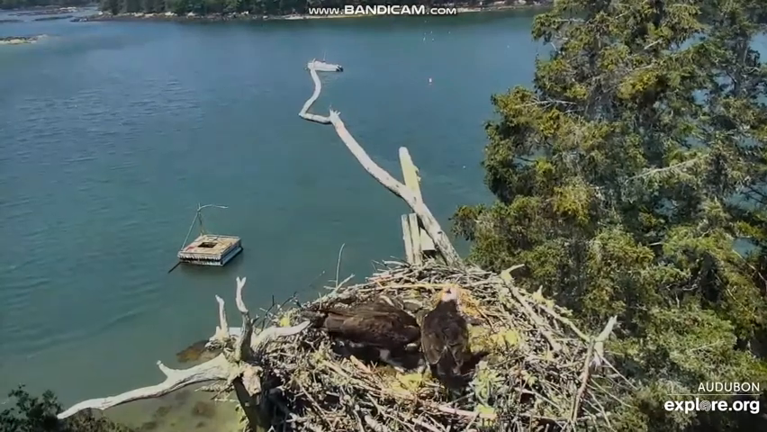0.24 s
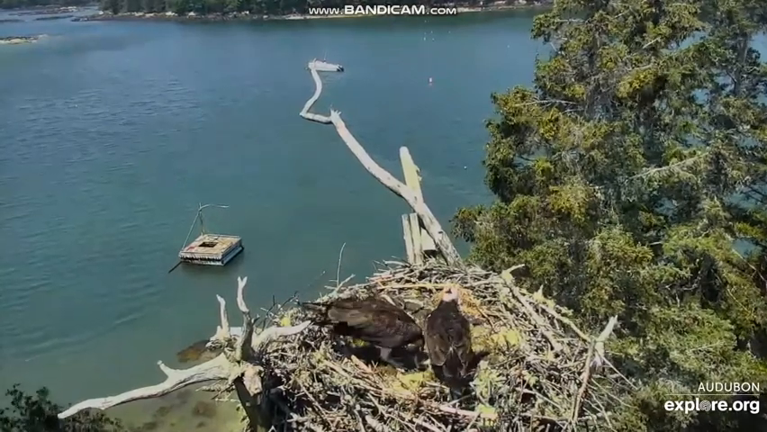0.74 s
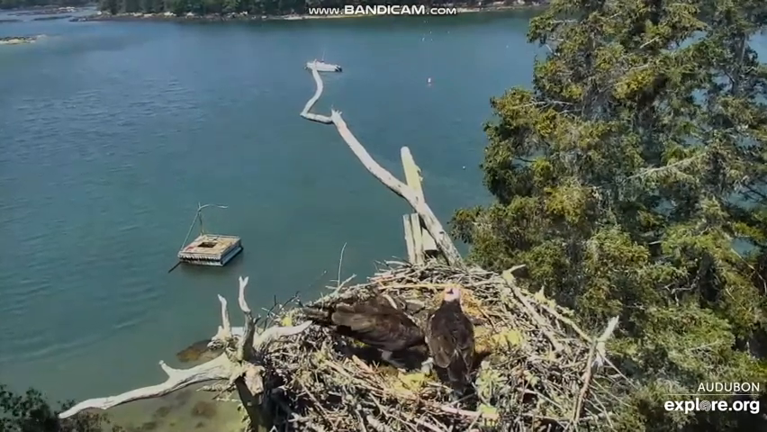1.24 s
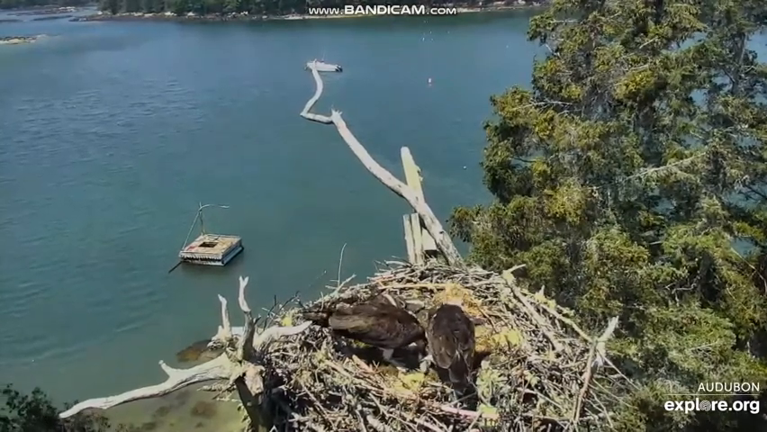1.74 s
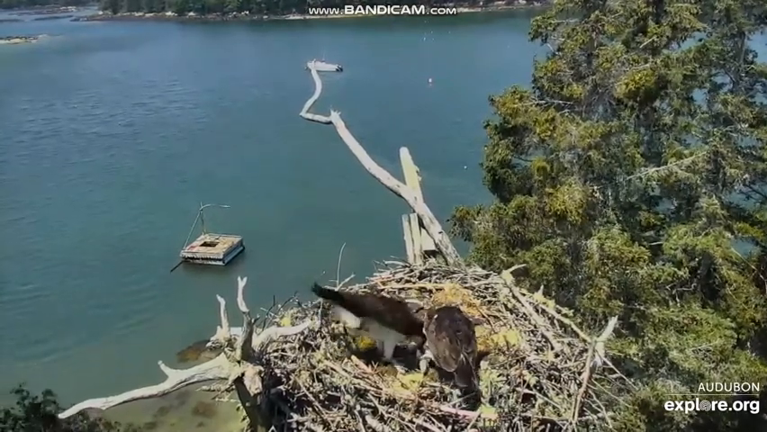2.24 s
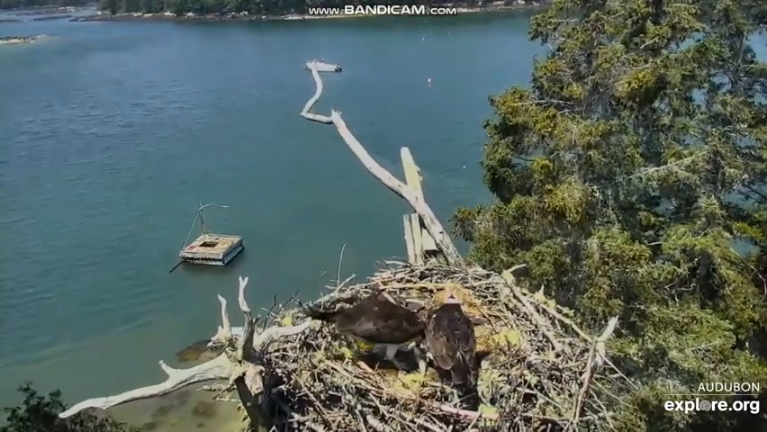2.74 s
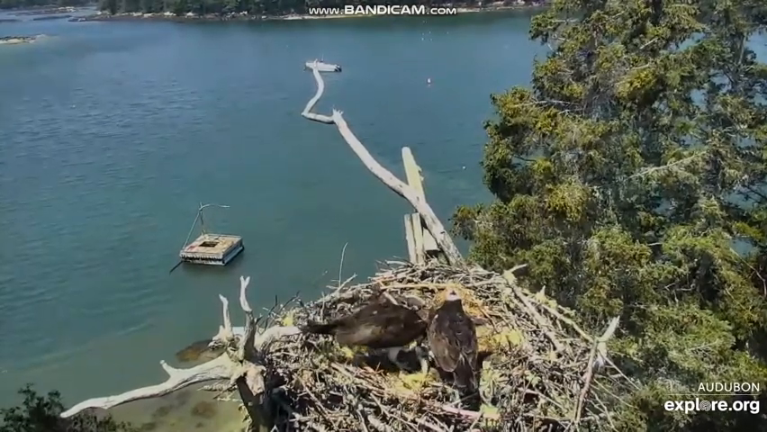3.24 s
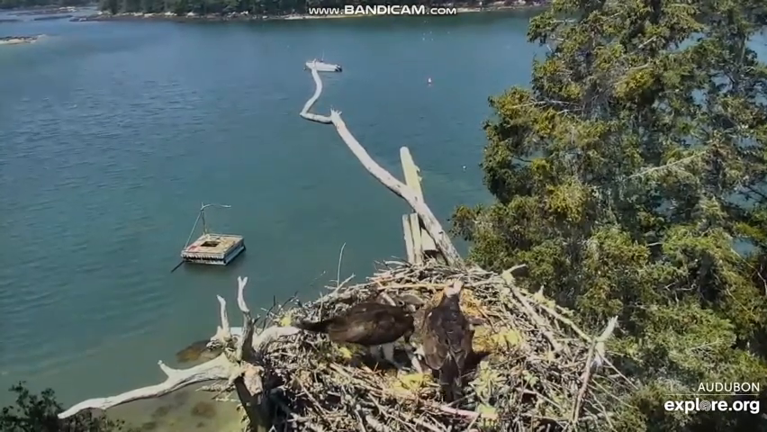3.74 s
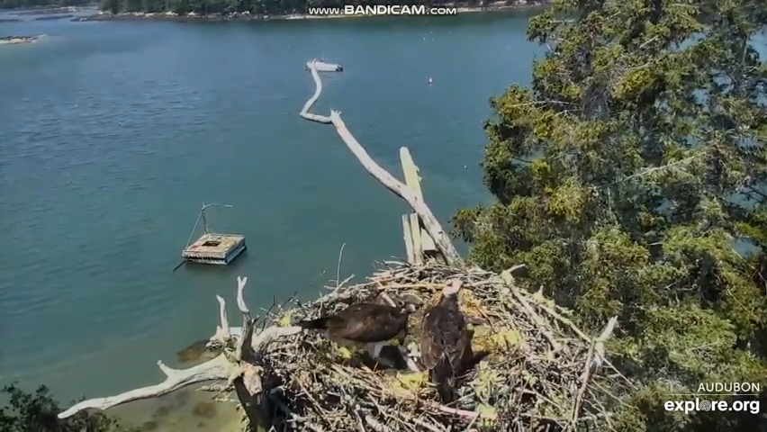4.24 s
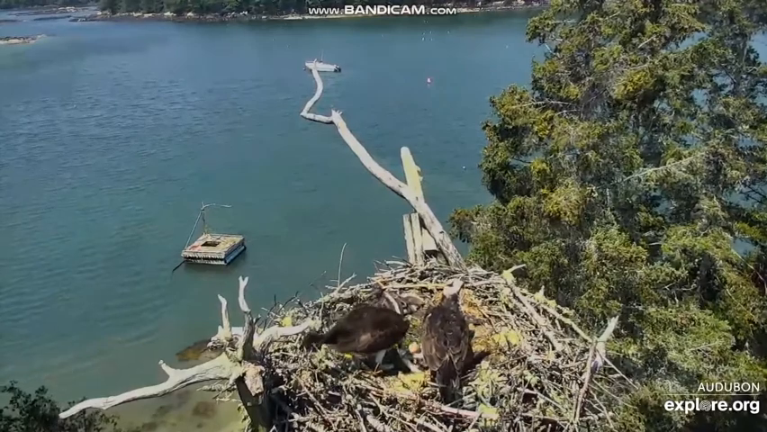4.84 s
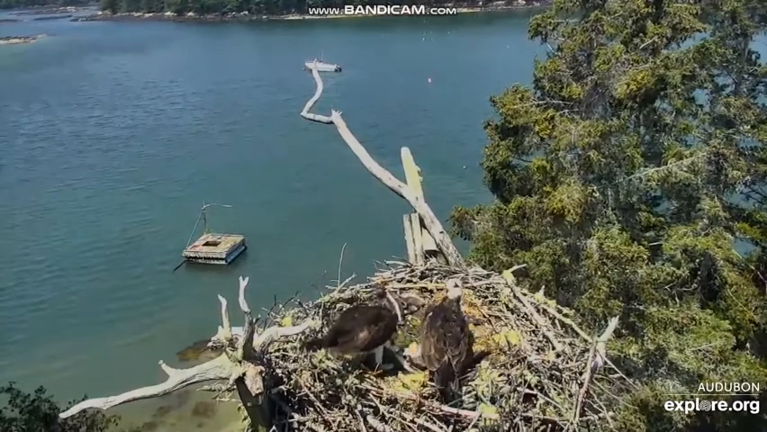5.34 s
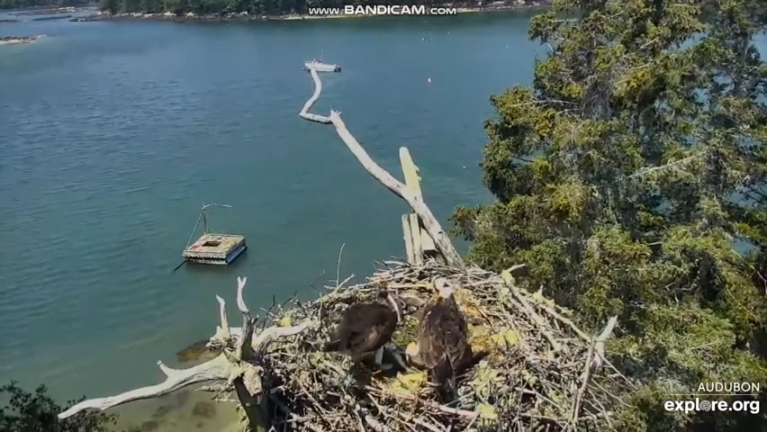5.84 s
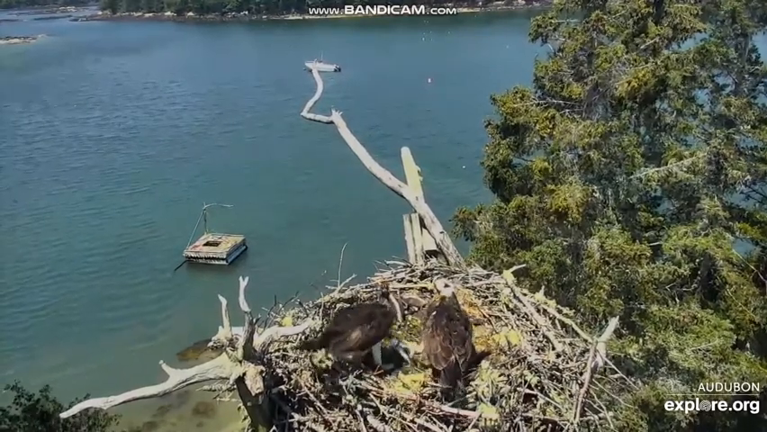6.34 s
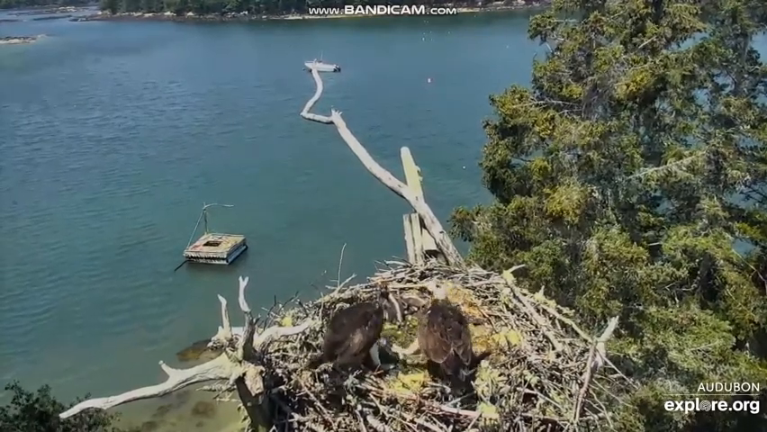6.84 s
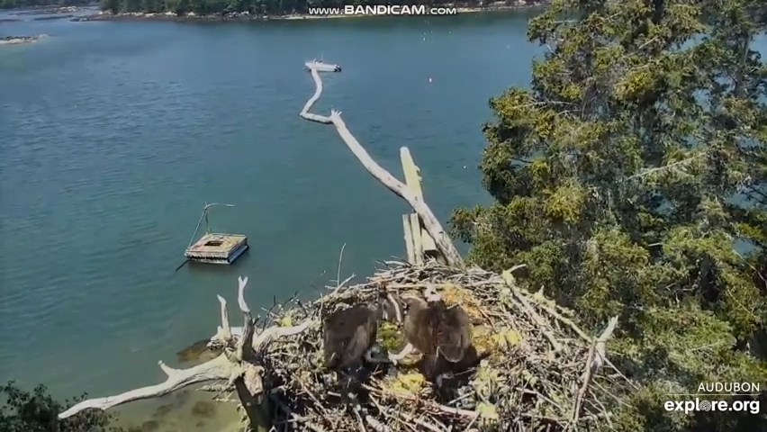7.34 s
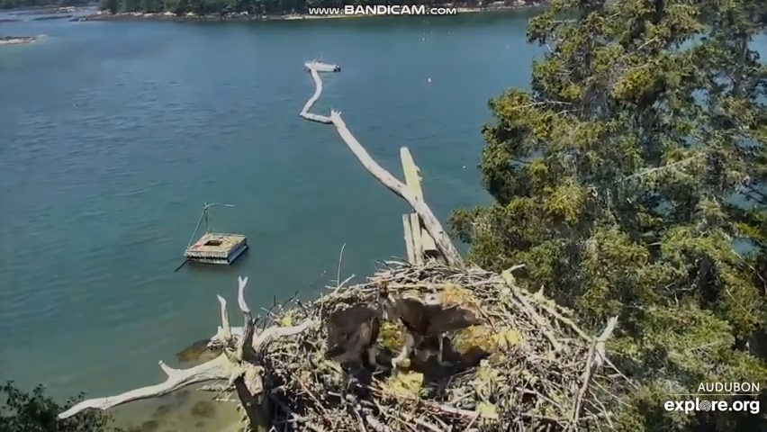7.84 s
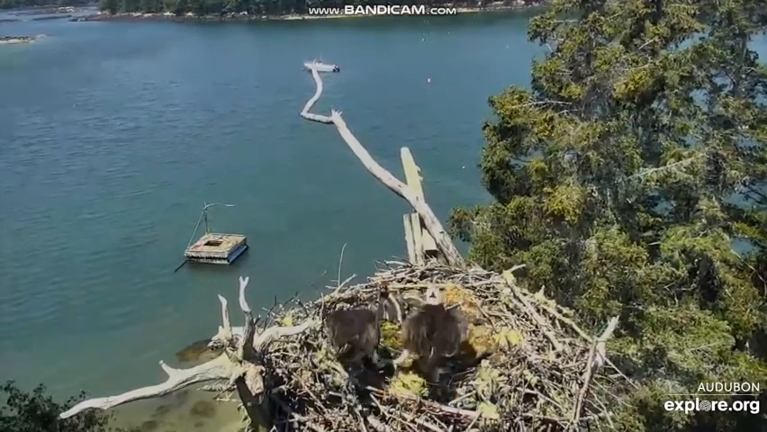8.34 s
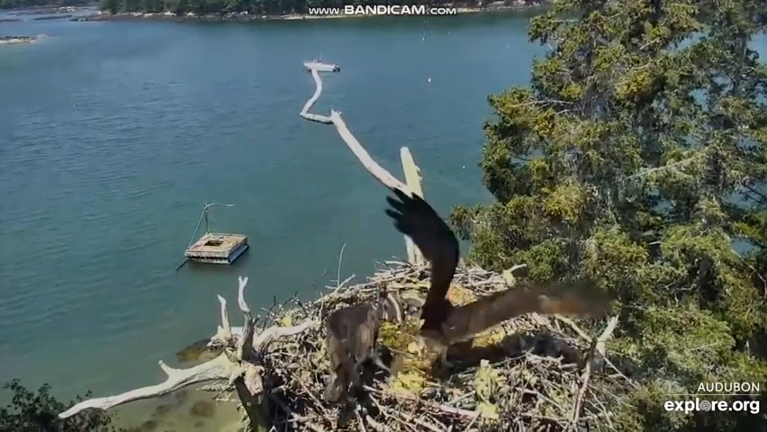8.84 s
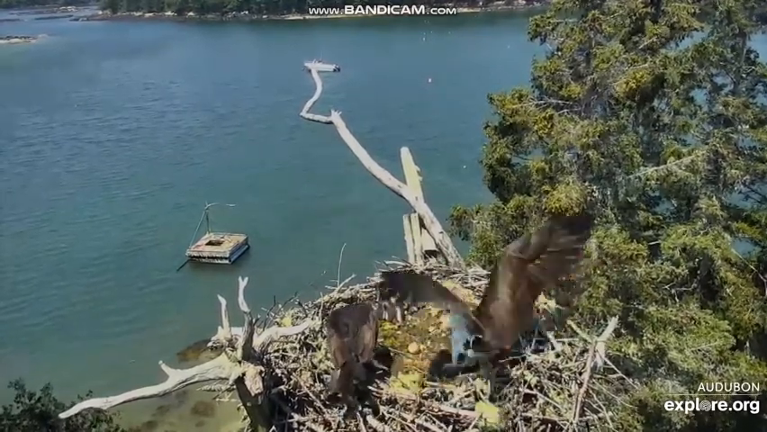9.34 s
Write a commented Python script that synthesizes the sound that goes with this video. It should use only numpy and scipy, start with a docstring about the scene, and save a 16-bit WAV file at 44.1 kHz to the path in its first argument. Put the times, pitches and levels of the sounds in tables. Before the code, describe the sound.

Two ospreys call excitedly on a nest above a lake, picked up by an exposed, wind-battered microphone. At 0-0.5 s a violent gust booms, thumps and crackles, pinning the input and chopping the first chirps. It eases around 0.6-1.2 s, exposing rapid high notes: low scoop, arched chip, thin squeak, falling chirp, with brief rough two-voiced screeches until about 1.6 s. Buffeting returns from 1.3 to 3.3 s, with a short lull near 2.3 s, while piercing chirps continue several times a second. Heavy blasts cut into calls again at 3.8-5.5 s; a very faint high whistle sounds around 4.5-5 s. From 5.5 to 8.4 s wind is mostly lighter, with a burst near 6.5 s, and calls stand clear, gradually lower and more spaced. Strong gusts and snaps return at 8.5-9.2 s, then ease as last chirps sound. A steady soft rush of trees and water and a faint hum remain throughout.

```python
"""A gust buffets a microphone as a chirp begins: two ospreys call excitedly on a lakeside nest.
A typical call is a low scoop, an arched chip, a thin squeak and a falling chirp, each a harmonic tone on
a pitch arch; a few calls are two-voiced screeches. Wind is filtered noise with held blasts and thumps; it
overloads the input, chopping the calls and crackling. Behind lie a steady rush of trees and water, made of
noise with one echo, a faint hum of wavering pitch and, halfway through, one far whistle."""
import sys
import numpy as np
from scipy import signal
from scipy.fft import rfft, irfft, next_fast_len
from scipy.io import wavfile
from scipy.ndimage import uniform_filter1d

SR = 44100
rng = np.random.default_rng(int(sys.argv[2]) if len(sys.argv) > 2 else 0)


def unload_wav(signal):
    """Save mono or channel-first audio to the path in sys.argv[1] as 16-bit WAV at rate SR, clipped to [-1, 1]."""
    wavfile.write(
        sys.argv[1],
        SR,
        np.round(np.clip(np.atleast_2d(signal).T, -1, 1) * 32767).astype(np.int16),
    )


N = 422919
TIME = np.arange(N) / SR   # seconds

# WIND AND OVERLOAD
# strength of the gusts, before the offset of each wind band: [start_s, relative_level_db]
GUST_CURVE = [(0, -13.5), (.25, -16.5), (.5, -24), (.6, -37), (1, -41.5), (1.3, -30), (1.53, -20),
              (1.78, -21), (2.28, -50.5), (2.44, -20.5), (3.2, -22.5), (3.55, -36), (3.8, -26), (4.35, -17),
              (4.68, -24.5), (5.03, -14), (5.45, -26.5), (5.6, -33), (6.02, -26), (6.15, -66), (6.36, -43),
              (6.44, -18.5), (6.55, -31.5), (6.78, -30.5), (6.88, -67.5), (7.6, -47.5), (7.69, -30.5),
              (7.9, -34), (8.28, -58.5), (8.47, -19), (8.75, -19), (9.05, -28.5), (9.2, -38.5),
              (9.55, -44.5)]
# slow heave of the air, before its offset: [start_s, relative_level_db]
HEAVE_CURVE = [(0.0, -2.5), (0.18, -4.5), (1.25, -21.5), (1.33, -11.5), (5.13, -8.5), (5.34, -26),
               (5.4, -11), (5.98, -8.5), (6.38, -34), (6.46, -5), (6.78, -7), (6.89, -34), (7.74, -13),
               (8.14, -27), (8.19, -19), (9.1, -4), (9.18, -19.5), (9.55, -11)]
# noise spectra of the slow, middle and fast turbulence: [frequency_hz, relative_level_db]
SWAY_SPECTRUM = [(3, -10), (8, 5.5), (16, 3), (27, -1), (40, -16.5), (70, -51.5), (200, -99)]
BUFFET_SPECTRUM = [(15, -23), (33, 1.5), (48, 3.5), (70, 0), (110, -24.5), (250, -80)]
EDDY_SPECTRUM = [(40, -21), (75, 2), (100, -1), (150, -12.5), (250, -16.5), (400, -25.5), (700, -38.5),
                 (1500, -49.5), (4000, -100)]
# single blasts that hold the microphone at its limit: [start_s, end_s]
HELD_BLASTS = [(.024, .045), (.066, .166), (.261, .282), (1.319, 1.347), (1.694, 1.716), (1.778, 1.8),
               (1.81, 1.858), (2.006, 2.053), (2.086, 2.13), (2.418, 2.43), (2.856, 2.922), (2.934, 2.974),
               (3.073, 3.085), (3.18, 3.211), (3.836, 3.86), (3.872, 3.909), (4.379, 4.432), (4.459, 4.5),
               (4.548, 4.574), (4.725, 4.759), (4.937, 4.975), (5.045, 5.09), (5.101, 5.277),
               (5.389, 5.427), (9.068, 9.094), (9.15, 9.2)]
# runs of vortices in the gusts, each a brief overload: [start_s, spacing_s, count, typical_hold_s]
VORTEX_TRAINS = [(.177, .018, 4, .012), (.294, .027, 3, .004), (1.517, .0142, 4, .007),
                 (2.437, .036, 3, .007), (2.706, .03, 2, .012), (4.018, .029, 2, .009),
                 (4.298, .032, 2, .007), (4.844, .018, 3, .007), (8.573, .0195, 4, .01),
                 (8.888, .0322, 5, .014)]
# pressure a blast reaches (full scale = 1), and its longest rise time in seconds
BLAST_PUSH, BLAST_RISE_S = 1.45, .009
# the hardest thumps of air on the microphone, before a common offset: [start_s, relative_level_db]
HARD_THUMPS = [(0.062, -16.5), (.192, -13.5), (.211, -6), (0.244, -16), (.4, -27), (1.351, -28),
               (1.613, -32.5), (1.802, -25.5), (2.972, -22.5), (4.166, -27), (4.5, -30), (4.524, -25),
               (4.979, -21.5), (5.429, -26), (6.424, -30), (9.064, -26)]
# the loudest snaps of the overloaded input, before a common offset: [start_s, relative_level_db]
LOUD_SNAPS = [(.192, -28), (0.211, -37), (.2239, -34), (0.2393, -30), (2.4414, -30), (2.7003, -24.5),
              (2.84, -26), (4.056, -23.5), (4.075, -26), (4.439, -18.5), (8.5714, -19), (9.0004, -40)]
OVERLOAD_KNEE = 22     # sharpness of the input limit
CUTOFF_HZ = 16000      # top of the passed band

# BACKGROUND
# noise spectrum of far trees and water: [frequency_hz, relative_level_db]
RUSH_SPECTRUM = [(100, 11.5), (400, 3), (800, 2), (1600, 4), (2500, 4.5), (3200, -4.5), (4400, -11),
                 (5200, -9.5), (6500, -21.5), (11000, -27), (16000, -44.5)]
# slowly changing level of the rush: [start_s, level_db]
RUSH_LEVEL = [(0.0, -50.5), (9.59, -51.5)]
HOUSING_ECHO_S, HOUSING_ECHO_DB = .002517, -5   # delay, and level against the direct sound
HUM_HZ, HUM_DB = 550, -69                       # centre pitch and centre level
# a thin, far whistle, perhaps a songbird: (start_s, end_s, centre_pitch_hz, peak_level_db)
WHISTLE = (4.5, 5, 7205.5, -56.5)

# CALLS: relative_level_db precedes the common trim of the voice; crest_place is a share of the note length
# falling chirps: [start_s, end_s, crest_hz, relative_level_db, rasp_db, crest_place]
FALLING_CHIRPS = [(.002, 0.038, 2700, -25.5, -12, 0.08), (0.282, .395, 2947, -23.5, -22.5, 0.45),
                  (0.706, 0.743, 2790, -25, -35, 0.1), (1.118, 1.154, 2643, -21, -22, .02),
                  (1.557, 1.591, 2540, -25, -46.5, 0.034), (1.608, 1.642, 2370, -32.5, -19.5, 0.12),
                  (1.862, 1.912, 2736, -25.5, -48, 0.25), (1.993, 2.087, 2770, -19, -39.5, 0.41),
                  (2.413, 2.5, 2790, -19, -29, 0.39), (2.495, 2.534, 2670, -18.5, -48, 0.083),
                  (2.787, 2.891, 2825, -25, -27.5, 0.49), (3.141, 3.173, 2630, -22, -24, 0.19),
                  (3.215, 3.282, 2763, -18.5, -39.5, 0.27), (3.509, 3.544, 2657, -23.5, -26.5, 0.23),
                  (3.616, 3.692, 2850, -21.5, -26, 0.34), (3.925, 3.948, 2750, -26, -50.5, 0.09),
                  (4.002, 4.108, 2833, -18, -50, 0.48), (4.415, 4.499, 2730, -17, -57, 0.28),
                  (4.752, 4.805, 2380, -36.5, -10, 0.46), (4.838, 4.907, 2637, -19, -32.5, 0.47),
                  (5.075, 5.103, 2546, -29, -18, 0.15), (5.278, 5.316, 2666, -28.5, -32, 0.036),
                  (5.665, 5.742, 2720, -32, -31, 0.31), (6.055, 6.133, 2670, -21.5, -55, .22),
                  (6.363, 6.402, 2646, -22.5, -23.5, 0.26), (6.471, 6.558, 2860, -20.5, -27.5, 0.07),
                  (6.862, 6.882, 2850, -29.5, -32, 0.61), (6.895, 6.966, 2890, -25, -20, 0.05),
                  (7.237, 7.33, 2672, -22.5, -31.5, 0.29), (7.545, 7.612, 2387, -30.5, -45, 0.37),
                  (7.675, 7.771, 2615, -22.5, -32, .39), (8.147, 8.206, 2596, -21, -27.5, .16),
                  (8.552, 8.66, 2540, -23.5, -23.5, .25), (8.939, 9.059, 2680, -21.5, -28, 0.45),
                  (9.38, 9.437, 2523, -27, -42, 0.24)]
CHIRP_DROP = .19   # share of the crest pitch lost by the end
# screeches, both sides of the syrinx at once:
# [start_s, end_s, low_voice_hz, high_voice_hz, relative_level_db, rasp_db]
TWO_VOICED_SCREECHES = [(.165, 0.26, 2770, 3590, -33.5, -9), (0.67, 0.721, 2920, 3580, -32, -20),
                        (1.036, 1.137, 2786, 3660, -28.5, -21.5), (1.419, 1.579, 2730, 3565, -39.5, -11)]
SCREECH_LOW_DROP, SCREECH_HIGH_DROP = 0.033, 0.11   # shares of the crest pitch lost by the end
# arched chips that open a call:
# [start_s, end_s, crest_hz, relative_level_db, rasp_db, relative_level_db of the scoop before it]
ARCHED_CHIPS = [(0.528, 0.577, 2840, -30.5, -39.5, -29), (0.91, 0.961, 2726, -23, -35.5, -36),
                (1.265, 1.304, 2606, -22.5, -39.5, -35), (2.276, 2.319, 2674, -20, -33, -33.5),
                (2.671, 2.755, 2700, -25.5, -29, -30.5), (3.07, 3.139, 2647, -21, -41, -37),
                (3.462, 3.506, 2654, -21.5, -34, -33.5), (3.875, 3.928, 2800, -27, -19, -26.5),
                (4.278, 4.358, 2584, -24.5, -24, -28.5), (4.699, 4.751, 2556, -22.5, -38.5, -32),
                (5.504, 5.564, 2626, -28.5, -34, -41), (5.921, 5.95, 2620, -22, -36, -31.5),
                (5.958, 5.997, 2700, -23, -29, -35.5), (6.306, 6.365, 2654, -21, -25, -29),
                (6.747, 6.792, 2780, -26, -21, -26), (7.118, 7.184, 2625, -24.5, -56, -27.5),
                (7.958, 8.019, 2620, -19.5, -34, -33.5), (8.379, 8.392, 2360, -32.5, -32, -43),
                (8.411, 8.464, 2423, -28.5, -28.5, -43.5), (8.833, 8.935, 2523, -23.5, -25.5, -45.5),
                (9.264, 9.318, 2555, -30, -33, -47.5)]
CHIP_CREST, CHIP_DROP = .48, .085   # place of the crest, and share of the crest pitch lost by the end
# length, overlap with the chip, top pitch, and rise as a share of the top pitch
SCOOP_S, SCOOP_OVERLAP_S, SCOOP_HZ, SCOOP_RISE = .026, 0.0067, 1806, 0.14
# thin squeaks and glides: [start_s, end_s, crest_hz, relative_level_db, share_of_pitch_lost, crest_place]
THIN_SQUEAKS = [(0.586, 0.675, 4270, -45.5, 0.1, 0.51), (.966, 1.029, 5340, -40.5, .1, 0.61),
                (1.376, 1.408, 5330, -45, 0.3, 0.05), (2.352, 2.42, 4460, -47.5, .15, .35),
                (3.565, 3.615, 4150, -43.5, .11, 0.6), (6.001, 6.059, 3630, -49, 0.099, 0.27),
                (6.443, 6.478, 4100, -48.5, 0.061, 0.3), (6.776, 6.864, 3720, -52, 0.084, .53),
                (7.184, 7.255, 2430, -33, .022, 0.93), (9.337, 9.37, 3630, -55, 0.044, .1)]
SQUEAK_RASP_DB = -24
# level croaks in the low register: [start_s, end_s, pitch_hz, relative_level_db, rasp_db]
LEVEL_CROAKS = [(1.029, 1.118, 1630, -39.5, -42.5), (3.013, 3.047, 1646, -33.5, -20),
                (5.998, 6.034, 1680, -36, -46)]

# TIMBRE
# second harmonic against the fundamental, before the common overtone trim: [start_s, relative_level_db]
SECOND_HARMONIC = [(.3, -19), (1.198, -23.5), (2, -14), (2.499, -18), (3.6, -15), (4.4, -12.5), (5.5, -7.5),
                   (6.1, -10.5), (8.101, -12), (9.4, -11.5)]
# the same for the other notes, LOW being scoops and croaks
SCREECH_SECOND_DB, SQUEAK_SECOND_DB, LOW_SECOND_DB = -32, -23.5, -10.5
# throat colour of the upper partials: [frequency_hz, level_db re the second harmonic]
THROAT_COLOUR = [(5000, -7.5), (6600, -14.5), (8300, -19.5), (9300, -29.5), (10500, -35.5), (12000, -25.5),
                 (13200, -30.5), (15500, -34.5)]
LOW_REGISTER_HZ = 2050   # notes of lower mean pitch are in the low register
# pitch wobble (share of the pitch) and noise (dB): a fixed part, then the part scaled by harshness
JITTER, ROUGH_JITTER, VOICE_NOISE_DB, ROUGH_NOISE_DB = .003, .045, -43, -1


def from_db(db):
    """Logarithmic level: decibels become an amplitude ratio."""
    return 10 ** (np.asarray(db) / 20)


def rms_one(x):
    """Power normalisation: scale to a root mean square of one."""
    return x / np.sqrt(np.mean(x ** 2) + 1e-20)


def butter(x, hz, kind, order=2):
    """Butterworth response: a causal low- or high-pass with a maximally flat passband."""
    return signal.sosfilt(signal.butter(order, min(hz, .45 * SR), kind, fs=SR, output="sos"), x)


def flutter(rate_hz):
    """Band-limited random modulation: low-passed noise wavers up to about the given rate, with spread 1."""
    return rms_one(butter(rng.standard_normal(N), rate_hz, "low"))


def coloured_noise(spectrum):
    """Spectral shaping: white noise is weighted by frequency and brought to unit power."""
    hz, db = np.transpose(spectrum)
    size = next_fast_len(N)
    bins_hz = np.maximum(np.arange(size // 2 + 1) * SR / size, 1)
    gain = from_db(np.interp(np.log(bins_hz), np.log(hz), db))
    white = rfft(rng.standard_normal(size))
    return rms_one(irfft(white * gain, size)[:N])


def evened(x, span_s):
    """Envelope division: dividing by the running power removes slow swells from a noise."""
    power = uniform_filter1d(x ** 2, max(int(span_s * SR), 2))
    return x / np.sqrt(power + 1e-3)


def delayed(x, seconds):
    """Propagation delay: the same sound arrives a little later."""
    return np.pad(x, (round(seconds * SR), 0))[:N]


def in_time(rows):
    """Linear interpolation: each column of a curve is joined by straight lines in time."""
    s, *columns = np.transpose(rows)
    return [np.interp(TIME, s, column) for column in columns]


def saturate(x, limit, knee):
    """Amplitude saturation: a signal rounds off towards a limit; a larger knee is a sharper corner."""
    return x / (1 + np.abs(x / limit) ** knee) ** (1 / knee)


def eddy_level(offset_db=-2.5, growth=1.108):
    """Turbulence scaling: the level of the fast eddies, in dB, grows with the wind."""
    return offset_db + growth * in_time(GUST_CURVE)[0]


def overloads(unevenness=.18):
    """Vortex shedding: yield (start_s, end_s) of blasts and of vortex trains with uneven holds."""
    yield from HELD_BLASTS
    for start, spacing, count, hold in VORTEX_TRAINS:
        for k in range(round(count)):
            vortex_start = start + k * spacing
            yield vortex_start, vortex_start + hold * np.exp(unevenness * rng.standard_normal())


def thumps(level_db=9, body_hz=260, per_s=45, stray_db=-4, spread_db=4):
    """Impulse response: small vortices slap the diaphragm, a few hard, many at random growing with eddies."""
    eddy_db = eddy_level()
    sign = rng.choice([-1, 1], N)
    strikes = rng.random(N) < per_s / SR
    scatter_db = spread_db * np.clip(rng.standard_normal(N), -2, 2)
    kicks = strikes * from_db(eddy_db + stray_db + scatter_db)
    for s, db in HARD_THUMPS:
        kicks[int(s * SR)] += from_db(db + level_db)
    # a sudden rise and a rounded recoil
    age = 2 * np.pi * body_hz * TIME[:SR // 50]
    slap = age * np.exp(1 - age) * np.cos(age / 2)
    return signal.fftconvolve(kicks * sign, slap)[:N]


def wind(sway_db=3.0, buffet_db=7.5, strong_db=-26, surge=0.26, ceiling=1.0, lump_db=4.5, lumps_hz=22):
    """Turbulent pressure: three bands of noise push the diaphragm, and the hardest blasts pin it."""
    (gust_db,), (heave_db,) = in_time(GUST_CURVE), in_time(HEAVE_CURVE)
    sway = from_db(heave_db + sway_db) * evened(coloured_noise(SWAY_SPECTRUM), .1237)
    buffet = from_db(gust_db + buffet_db) * evened(coloured_noise(BUFFET_SPECTRUM), .12)
    eddy_db = eddy_level() + lump_db * flutter(lumps_hz)
    eddies = from_db(eddy_db) * evened(coloured_noise(EDDY_SPECTRUM), 0.022)
    # strong gusts gain extra force
    extra_db = surge * np.maximum(gust_db - strong_db, 0)
    pressure = (sway + buffet + eddies) * from_db(extra_db)
    # gusts round off softly before the blasts are added
    pressure = saturate(pressure, ceiling, knee=3.21)
    for start, end in overloads():
        # a blast shoves the diaphragm further the way it already leans
        first = max(int((start - BLAST_RISE_S) * SR), 0)
        near = slice(first, int((end + BLAST_RISE_S) * SR))
        rise_s = min(BLAST_RISE_S, end - start)   # brief blasts come and go faster
        inside = np.minimum(TIME[near] - start, end - TIME[near]) / rise_s
        hold = np.sin(np.pi / 2 * np.clip(inside + .5, 0, 1)) ** 2
        target = BLAST_PUSH * np.sign(pressure[int(start * SR)])
        pressure[near] += hold * (target - pressure[near])
    return pressure + thumps()


def rush():
    """Comb filtering: the noise of far trees and water meets its reflection from the camera housing."""
    noise = coloured_noise(RUSH_SPECTRUM)
    echo = from_db(HOUSING_ECHO_DB) * delayed(noise, HOUSING_ECHO_S)
    level_db, = in_time(RUSH_LEVEL)
    return from_db(level_db) * rms_one(noise + echo)


def hum(spread_hz=6):
    """Frequency modulation: a faint sine wavers in pitch and level, perhaps a motor far across the water."""
    phase = 2 * np.pi * np.cumsum(HUM_HZ + spread_hz * flutter(27)) / SR
    return from_db(HUM_DB + 1.3 * flutter(2.5)) * np.sin(phase)


def arch(crest_hz, drop, crest=.5):
    """Parabolic glide: pitch at start, middle and end, peaking at `crest` and ending the share `drop` lower."""
    crest = np.clip(crest, 0, .7)
    from_crest = (np.array([0, .5, 1]) - crest) / (1 - crest)
    return crest_hz * (1 - drop * from_crest ** 2)


def notes():
    """Vocal gesture: yield each note's start_s, end_s, arch_hz, level_db, second_harmonic_db and rasp_db."""
    when, second_db = np.transpose(SECOND_HARMONIC)
    for start, end, hz, db, rasp_db, crest in FALLING_CHIRPS:
        yield start, end, arch(hz, CHIRP_DROP, crest), db, np.interp(start, when, second_db), rasp_db
    for start, end, low_hz, high_hz, db, rasp_db in TWO_VOICED_SCREECHES:
        yield start, end, arch(low_hz, SCREECH_LOW_DROP), db, SCREECH_SECOND_DB, rasp_db
        yield start, end, arch(high_hz, SCREECH_HIGH_DROP), db, SCREECH_SECOND_DB, rasp_db
    scoop_hz = SCOOP_HZ * (1 - SCOOP_RISE * np.array([1, .5, 0]) ** 2)
    for start, end, hz, db, rasp_db, scoop_db in ARCHED_CHIPS:
        flip = start + SCOOP_OVERLAP_S
        yield flip - SCOOP_S, flip, scoop_hz, scoop_db, LOW_SECOND_DB, rasp_db
        chip_second_db = np.interp(start, when, second_db)
        yield start, end, arch(hz, CHIP_DROP, CHIP_CREST), db, chip_second_db, rasp_db
    for start, end, hz, db, drop, crest in THIN_SQUEAKS:
        yield start, end, arch(hz, drop, crest), db, SQUEAK_SECOND_DB, SQUEAK_RASP_DB
    for start, end, hz, db, rasp_db in LEVEL_CROAKS:
        yield start, end, arch(hz, 0), db, LOW_SECOND_DB, rasp_db


def ospreys(shimmer=0.14, attack_s=0.0017, release_s=0.0078, sag_db=75, between_db=17,
            low_register_db=-11, level_db=0.5, overtone_db=1.0, bend=.09, flicker_db=1.52):
    """Harmonic synthesis: each note is one arch of effort, its loudness tied to its pitch."""
    out = np.zeros(N)
    waver, tremble, rasp, air = flutter(200), flutter(170), flutter(170), flutter(750)
    wander, flicker = flutter(60), flutter(70)
    throat_hz, throat_db = np.transpose(THROAT_COLOUR)
    for start, end, arch_hz, db, second_db, rasp_db in notes():
        at = np.arange(int(start * SR), min(int(max(end, start + .004) * SR), N))
        t = TIME[at] - TIME[at[0]]
        harsh = from_db(min(rasp_db, -6))
        pitch = np.polyval(np.polyfit([0, .5, 1], arch_hz, 2), t / t[-1])
        pitch *= 1 + bend * harsh * wander[at]   # harsh notes stray from their arch
        jitter = (JITTER + ROUGH_JITTER * harsh) * waver[at]
        phase = 2 * np.pi * np.cumsum(pitch * (1 + jitter)) / SR
        # the voice weakens where the pitch sags below its median
        sag = np.minimum(pitch / np.median(pitch) - 1, 0)
        edges = np.minimum(t / attack_s, 1) * np.minimum((t[-1] - t) / release_s, 1)
        loudness_db = db + level_db + sag_db * sag + flicker_db * flicker[at]
        loudness = from_db(loudness_db) * np.sin(np.pi / 2 * edges) ** 2
        # alternate strong and weak cycles put faint lines between the harmonics
        uneven = 1 + .5 * rasp[at]
        between = min(harsh * from_db(between_db), 1) * uneven
        doubling = 1 + harsh * uneven * np.cos(phase / 2)
        # the low register carries little above its second harmonic
        register = from_db(low_register_db * (pitch.mean() < LOW_REGISTER_HZ))
        upper = np.sin(2 * phase)
        for halves in range(5, 11):   # partials at 2.5 to 5 times the pitch
            partial_hz = halves / 2 * pitch
            gain = from_db(np.interp(partial_hz, throat_hz, throat_db)) * (partial_hz < SR / 2)
            strength = between if halves % 2 else 1
            upper += register * gain * np.sin(halves / 2 * phase) * strength
        tone = np.sin(phase) + from_db(second_db + overtone_db) * upper
        breath = (from_db(VOICE_NOISE_DB) + harsh * from_db(ROUGH_NOISE_DB)) * air[at]
        roughness = 1 + shimmer * tremble[at] + breath
        out[at] += loudness * roughness * doubling * tone
    return out


def shore(x, t60=1.0, wet_db=-35, tail_hz=6500):
    """Diffuse reverberation: near trees and the shore scatter a faint, exponentially decaying tail."""
    t = TIME[:SR]
    tail = rng.standard_normal(len(t)) * from_db(-60 * t / t60)
    scattered = signal.fftconvolve(x, tail / np.linalg.norm(tail))[:N]
    return x + from_db(wet_db) * butter(scattered, tail_hz, "low")


def snaps(dry, limit, level_db=-3, crackle_db=-29, decay_s=0.0017, low_hz=1500, high_hz=6000):
    """Overload transients: decaying noise bursts, a few loud, and small ones as the sound crosses the limit."""
    crossing = np.diff(np.abs(dry) > limit, prepend=False)
    kicks = from_db(crackle_db) * crossing * np.abs(butter(dry, low_hz, "high"))
    for s, db in LOUD_SNAPS:
        kicks[int(s * SR)] += from_db(db + level_db)
    decay = np.exp(-TIME[:SR // 100] / decay_s)
    grit = rng.standard_normal(N) * signal.fftconvolve(kicks, decay)[:N]
    return butter(butter(grit, low_hz, "high", order=1), high_hz, "low", order=1)


def far_whistle(wobble_hz=30):
    """Pure tone: one faint sine of nearly level pitch swells and fades."""
    start, end, hz, db = WHISTLE
    progress = np.clip((TIME - start) / (end - start), 0, 1)
    swell = np.sqrt(np.abs(np.sin(np.pi * progress)))
    phase = 2 * np.pi * np.cumsum(hz + wobble_hz * flutter(100)) / SR
    return from_db(db) * swell * np.sin(phase)


def scene():
    """Superposition: the pressures of all sources add at the one microphone."""
    return (shore(ospreys()) + rush() + hum() + far_whistle() + wind())[None]


def record(dry, limit=0.899, hiss_db=-80):
    """Input overload: while wind holds the input at its limit, calls and background vanish."""
    held = saturate(dry, limit, knee=OVERLOAD_KNEE)
    # a held level droops slowly
    coupled = butter(held, 0.18, "high", order=1)
    hiss = from_db(hiss_db) * rms_one(butter(rng.standard_normal(N), 1800, "low", order=1))
    out = coupled + snaps(dry[0], limit) + hiss
    return signal.sosfilt(signal.ellip(10, .1, 80, CUTOFF_HZ, fs=SR, output="sos"), out)


dry = scene()
out = record(dry)
unload_wav(out)
```